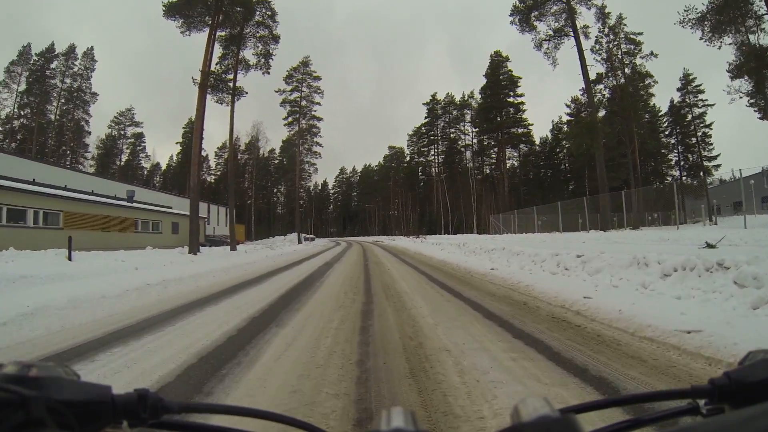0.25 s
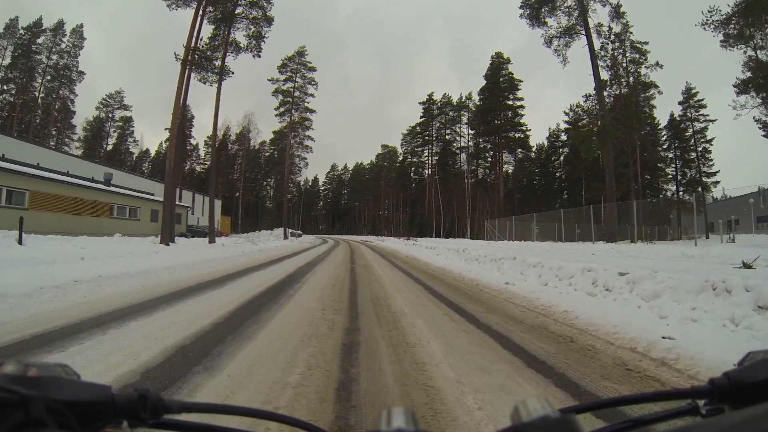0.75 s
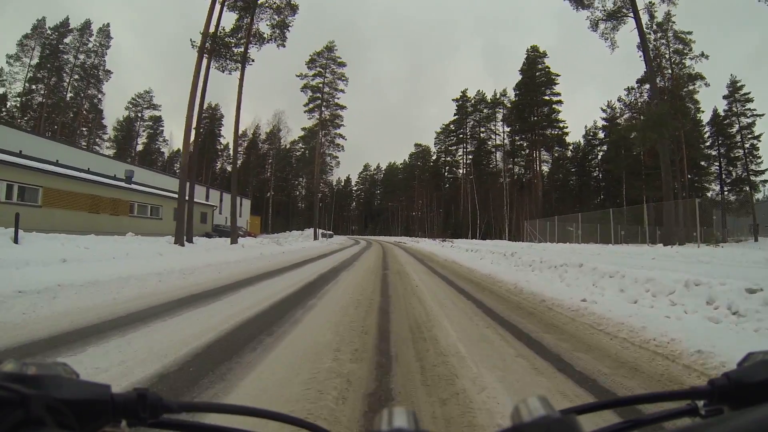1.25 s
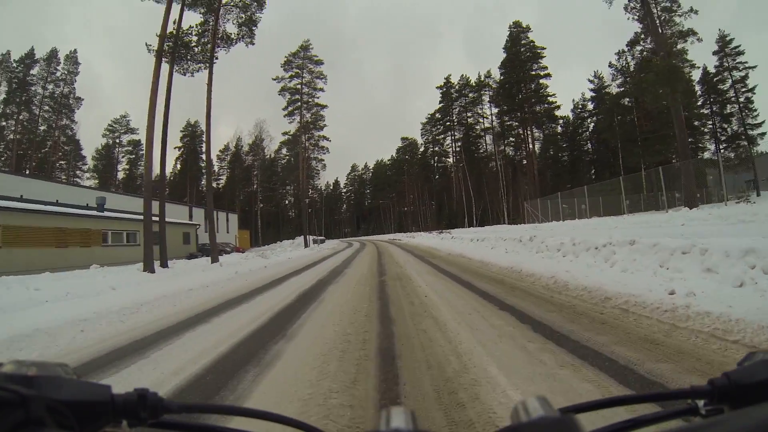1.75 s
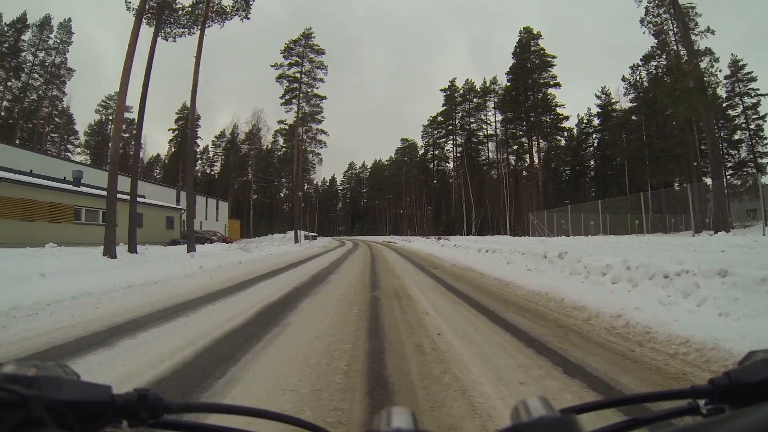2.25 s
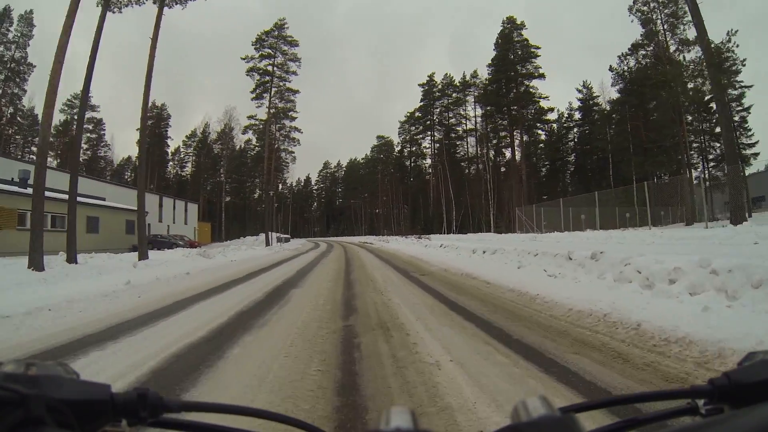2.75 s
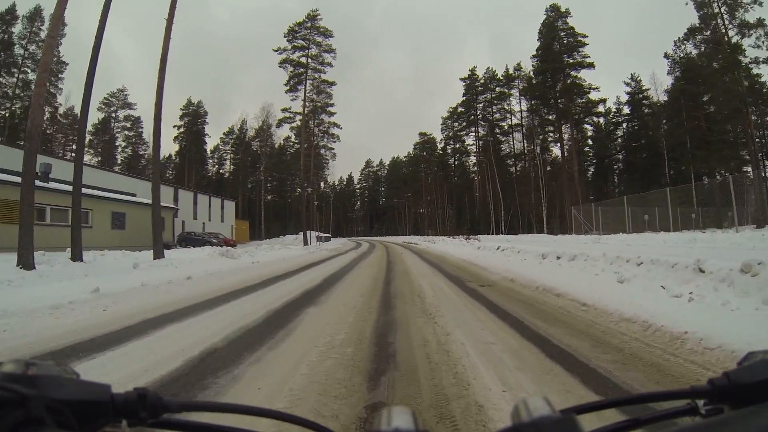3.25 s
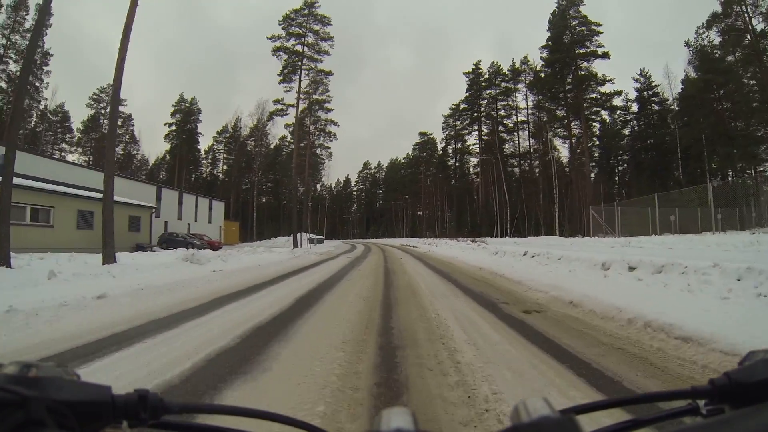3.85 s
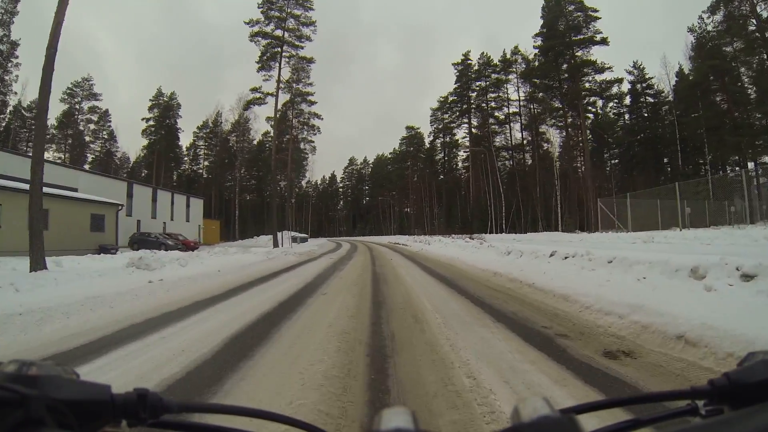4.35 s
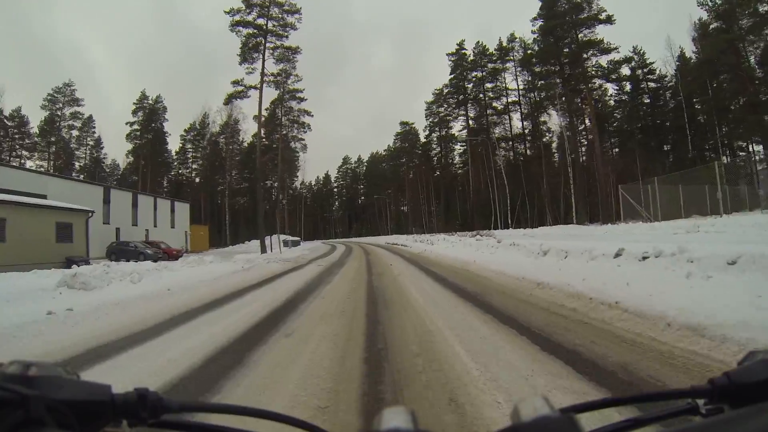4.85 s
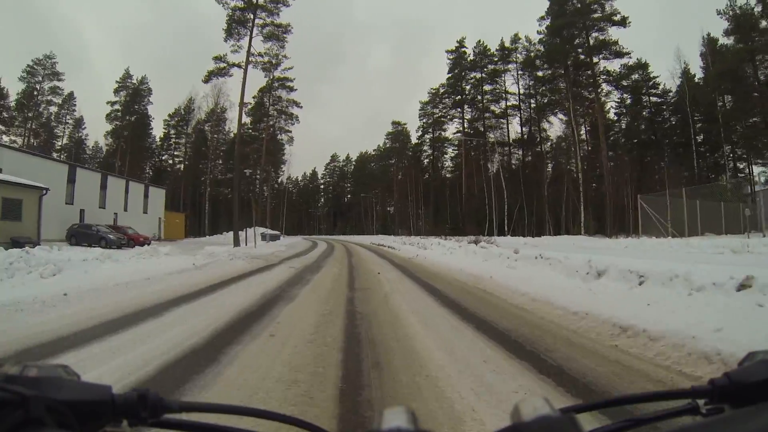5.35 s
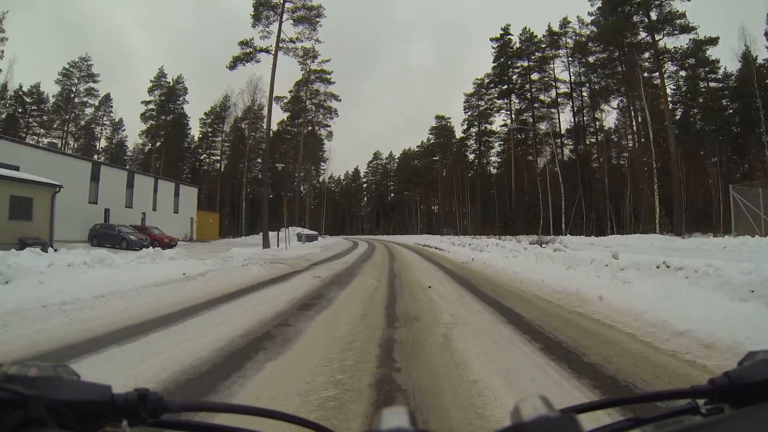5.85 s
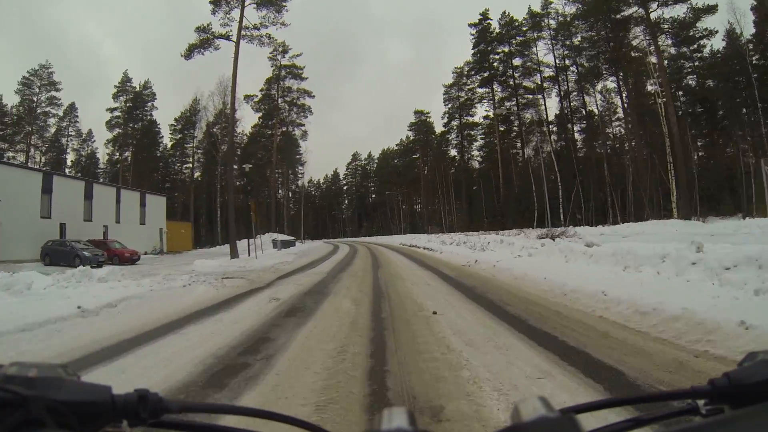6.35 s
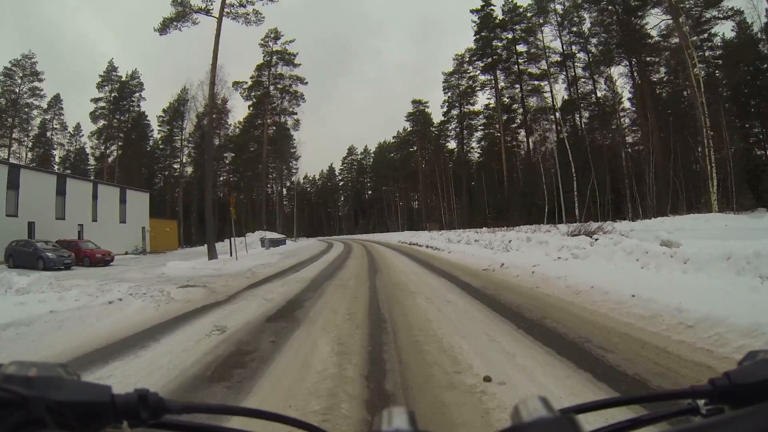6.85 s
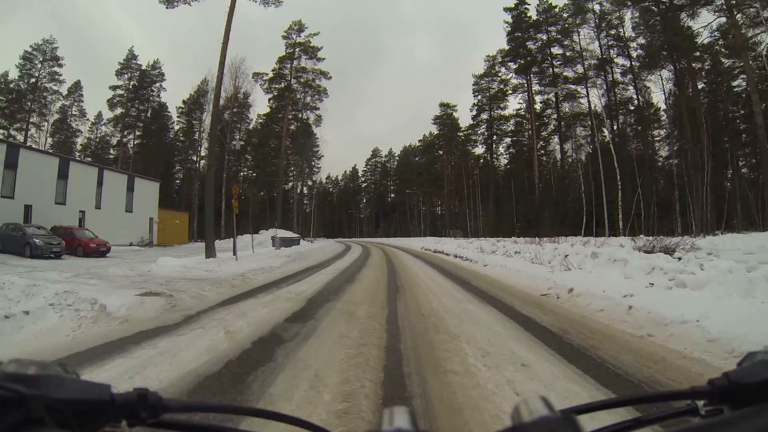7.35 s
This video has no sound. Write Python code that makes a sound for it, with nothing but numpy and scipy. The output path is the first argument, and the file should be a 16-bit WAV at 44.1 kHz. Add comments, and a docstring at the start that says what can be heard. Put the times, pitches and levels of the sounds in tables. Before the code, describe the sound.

A bike rides a snowy forest road outdoors. The handlebar microphone, dulled by its case, catches vibrating frame hum, rough tyre buzz, crumbling snow and gusty low wind. Irregular jolts and faint grit ticks come and go, one loud crack briefly ducks everything at about 5.2 seconds, and a rougher rattling patch follows before the ride continues.

```python
"""Bicycle over packed snow, heard from the handlebar

The microphone rides in a closed case clamped to the handlebar of a bicycle on packed snow. Road shake comes
through the frame: two wavering tones are the clamp and handlebar bending; noise through resonances is the case
ringing with tyre buzz, crunch and knocks. Fine spray and grit ticks leak through the wall, one hard crack
strikes the case, filtered noise makes the wind, and a peak limiter ducks everything after the loudest peaks."""
import sys
import numpy as np
from scipy import signal
from scipy.fft import rfft, irfft
from scipy.io import wavfile
from scipy.ndimage import uniform_filter1d

SR = 44100
rng = np.random.default_rng(int(sys.argv[2]) if len(sys.argv) > 2 else 0)


def invert_db(x):
    """Field ratio 10**(x/20) for x, a level in decibels (scalar or array-like)."""
    u = np.asarray(x, float) / 20
    return 10 ** u


def store_wav(level_fs):
    """Save 16-bit WAV to argv[1]."""
    pcm = np.round(np.clip(np.atleast_2d(level_fs), -1, 1) * 32767)
    wavfile.write(sys.argv[1], SR, pcm.T.astype(np.int16))


N = 335160


def case(buzz_db):
    """The case as a resonator: buzz drives its low modes, crunch the upper ones, knocks drive all."""
    # modes of the case and its clamp: f/Hz, width/Hz, relative level/dB
    low_modes = [(302, 89, -15.5), (362.4, 63, -13), (471.2, 77.5, 0.5), (583.4, 86.6, 2),
                 (666.6, 39.4, -5), (739.5, 48, -5), (886, 159, -14.5)]
    mid_modes = [(1154, 850, -6.5), (1417, 74, -3), (1565, 218, 2), (1788, 340, -6.5), (1992, 190, -1)]
    high_modes = [(2380, 150, -10.5), (3012, 546, 5.5), (3564, 70, -2), (3907, 307, -2.5), (4456, 510, -31)]
    # what leaks through the wall: f/Hz, relative level/dB
    leak = [(3000, -68), (3900, -33), (4700, 0), (5100, 1.5), (6400, -7), (7060, -14.5), (7700, -4.5),
            (8500, -8), (10000, -14), (11300, -15), (12300, -20), (12800, -23), (13500, -24),
            (15200, -23.5)]
    # the snow under the tyre between the swells: t/s, crunch level/dB, fine spray level/dB (both relative)
    snow_levels = [(0, -35.5, -62), (1, -36.5, -64), (2.5, -30, -62.5), (3.3, -31, -62), (4.7, -32, -62.5),
                   (5.3, -34, -64.5), (5.7, -35, -62.5), (6, -41, -68.5), (7, -37.5, -69.5),
                   (7.6, -28, -61)]
    crunch_db, spray_db = curves(snow_levels) + swells()
    runs = np.minimum(clumps(per_s=90, seconds=0.02) + 0.08 * clumps(per_s=5, seconds=0.01), 3.5)
    buzz = invert_db(buzz_db) * tyre_buzz(runs)
    crunch, spray = snow_grains(runs)
    crunch = invert_db(crunch_db) * crunch
    spray = invert_db(spray_db) * spray
    thud, knock, clack, tick = knocks()

    low = ring(buzz + thud, low_modes)
    mid = ring(invert_db(-0.93) * crunch + knock, mid_modes)
    # the more spray there is against crunch, the brighter the crunch
    high_db = -9.5 + 0.22 * (spray_db - crunch_db + 29.5)
    high = ring(invert_db(high_db) * crunch + clack, high_modes)
    top = invert_db(11.5) * coloured(spray + tick, leak)
    wall = signal.butter(3, 4700, fs=SR, output="sos")  # the closed wall dulls the frame's sound
    return signal.sosfilt(wall, low + mid + high) + top


def tyre_buzz(runs):
    """Tyre shake: noise whose level follows the runs of breaking crust and a fast flutter; rms 1."""
    shake_db = 1.2 * runs + 1.1 * flutter(0.0079)
    buzz = evened(rng.standard_normal(N) * invert_db(shake_db))
    return evened(patchy(buzz, patchy_db=1.2))


def snow_grains(runs):
    """Crunch and fine spray: random grain clicks over noise, swelling with the runs; each of rms 1."""
    grit = grains(per_s=1400, spread_db=3.6) + .3 * rng.standard_normal(N)
    fine = grains(per_s=2500, spread_db=3.8) + 0.45 * rng.standard_normal(N)
    crunch = grit * invert_db(2.35 * runs)
    spray = (fine + .4 * grit) * invert_db(1.8 * np.minimum(runs, 2))
    return evened(patchy(crunch, patchy_db=2.0)), evened(patchy(spray, patchy_db=1.9))


def swells():
    """Extra dB of crunch and of spray: smooth bumps, about once a pedal stroke and on crusty patches."""
    # peak t/s, half length/s, extra crunch level/dB, extra spray level/dB
    bumps = [(0.257, 0.11, 7, 2.5), (0.533, 0.24, 7, 3.5), (1.261, 0.13, 7, 6.5), (1.592, 0.11, 3, 4.5),
             (2.14, .14, 6.5, 1.5), (2.833, 0.094, 4.5, 9), (3.775, 0.23, 6.5, 6), (4.34, 0.078, 5, 8.5),
             (5.16, 0.19, 6.5, 5), (6.17, 0.081, 12.5, 5.5), (6.554, 0.27, 4, 3), (7.334, 0.079, 7, 11)]
    t = np.arange(N) / SR
    return sum(np.outer(db, np.exp(-((t - s) / half) ** 2)) for s, half, *db in bumps)


def knocks():
    """Four drives, from thud to tick, holding one burst per knock; the higher, the shorter and sharper."""
    # single knocks and low thumps through the frame, strong and weak, before the trim:
    # t/s, level/dB, thud level/dB and clack level/dB (both re the knock), length/s
    placed_knocks = [(0.1174, -17, -25, -10, 0.0039), (0.1824, -29, 11, 0, 0.0044),
                     (0.2813, -8, 0, -17.5, 0.0041), (0.377, -14.5, -5, -24, 0.0054),
                     (0.4135, -13, -2.5, -23, 0.0047), (0.4439, -16, 3, -31, 0.0063),
                     (0.4833, -16.5, 5, -11, 0.0042), (0.5227, -14.5, -4, -11.5, 0.0047),
                     (1.2072, -19.5, -9, -11, 0.0045), (1.2684, -23, 9, -4, 0.0031),
                     (1.2994, -20.5, 9, -0.5, 0.0042), (1.3818, -26.5, -10, -0.5, 0.0054),
                     (1.5964, -17, 11, -8, 0.0036), (1.7828, -20.5, 3, -9, 0.0042),
                     (1.9135, -7, -15, -22, 0.0026), (1.9544, -17, -11, -11, 0.0059),
                     (2.0263, -6.5, 6, -15, 0.0034), (2.0552, -9, -13, -26, 0.0034),
                     (2.0747, -16.5, 6, -40, 0.0049), (2.1181, -14.5, 10, -12, 0.0035),
                     (2.2039, -11.5, -7, -12, 0.0046), (2.4044, -12.5, -4, -14, 0.0038),
                     (2.5481, -25, 1, -18, 0.0052), (2.6604, -18.5, 8, -7, 0.0056),
                     (2.8779, -20.5, -15, -21, 0.0042), (3.0774, -19.5, 13, -14, 0.0037),
                     (3.5119, -15.5, -8, -22, 0.0039), (3.7025, -20.5, 1, -4, 0.0042),
                     (3.8397, -2.5, -0.5, -18, 0.0045), (4.0607, -11, -8, -18, 0.0032),
                     (4.118, -33, 16, -4, 0.0042), (4.2078, -12, -14, -16, 0.0067),
                     (4.2802, -18, 3, -22, 0.0081), (4.3894, -5.5, 3, -7.5, 0.0038),
                     (4.6039, -19.5, 3, -14, 0.0046), (4.9806, -8, -10, -19, 0.0044),
                     (5.1424, -25.5, 10, -18, 0.0052), (5.449, -7, -4, -17, 0.0057),
                     (5.5353, -15.5, -8, -13, 0.0046), (5.7229, -16, 0, -11, 0.0042),
                     (6.0726, -18, 14.5, -22, 0.0031), (6.1215, -12.5, 0, -11, 0.0079),
                     (6.1809, -11.5, 1, -14, 0.0042), (6.2093, -15, 7, -15, 0.0035),
                     (6.2282, -14, 7, -9.5, 0.0046), (6.2632, -22.5, 12.5, -15, 0.0042),
                     (6.2746, -12.5, -10, -16, 0.0036), (6.327, -17, -2, -18, 0.005),
                     (6.3594, -9, -10, -11.5, 0.0038), (6.3934, -18, 15, -5, 0.0028),
                     (6.4054, -26.5, 19.5, -14, 0.0038), (6.4338, -12, 4, -12, 0.006),
                     (6.4684, -27.5, 17.5, -9, 0.0052), (6.5655, -12, -11, -17.5, 0.0042),
                     (6.5949, -9, -14, -14, 0.0042), (6.6194, -9.5, 1, -10, 0.0052),
                     (6.6403, -7.5, -3.5, -8, 0.0047), (6.6682, -10, -3, -13.5, 0.0073),
                     (6.7374, -25, 21.5, -21, 0.0047), (6.7575, -10, -9, -12.5, 0.0032),
                     (6.8339, -13, -2, -10, 0.0057), (6.8463, -9.5, -7, -18, 0.0064),
                     (6.8917, -2, -3, -14.5, 0.0029), (6.8992, -1.5, 5.5, -23, 0.0021),
                     (6.9301, -15.5, -14, -14, 0.005), (7.1038, -5.5, 9, -8.5, 0.0028),
                     (7.3467, -18, 11.5, -8.5, 0.008), (7.4395, -8.5, 0, -25, 0.0054)]
    # grit flicked against the case, before the trim: t/s, level/dB
    grit_ticks = [(0.1181, -37.5), (0.1824, -43), (1.2396, -39.5), (1.2915, -43.5), (1.3823, -40),
                  (2.0298, -39), (2.2034, -45.5), (2.6609, -35.5), (3.8402, -38), (4.3924, -36),
                  (4.9901, -28), (5.7239, -34), (5.9823, -50), (6.1818, -44.5), (6.1994, -50),
                  (6.2794, -46), (6.6179, -35), (6.6672, -38), (6.9002, -39.5), (7.1067, -43)]
    tick_db = -48.5  # treble of a knock re its level
    grit_s = 0.0031
    rows = list(placed_knocks) + small_knocks()
    drive = np.zeros((4, N + 2048))
    noise = rng.standard_normal((len(rows), 4, 2048))
    for (s, db, thud_db, clack_db, seconds), shake in zip(rows, noise):
        at = round(s * SR)
        # per drive: level with a fixed trim, share of the length, rise time in s
        parts = ((thud_db - 4.0, 1.4, .0015), (-8.5, 1.1, .0005),
                 (clack_db - 3.5, .9, .0003), (tick_db, .6, .0001))
        for row, (re_db, lasting, rise) in enumerate(parts):
            drive[row, at:at + 2048] += invert_db(db + re_db) * burst(seconds * lasting, shake[row], rise)
    grit_noise = rng.standard_normal((len(grit_ticks), 2048))
    for (s, db), shake in zip(grit_ticks, grit_noise):
        at = round(s * SR)
        drive[3, at:at + 2048] += invert_db(db - 9) * burst(grit_s, shake, rise=.0001)
    return drive[:, :N]


def small_knocks():
    """The many small jolts: rows like the placed ones, at random times and with random colour."""
    per_s, level_db, spread_db = 8, -24.5, 1
    length_s, length_spread = .0038, 0.58  # spread of the log length
    draw = rng.standard_normal((200, 4))
    s = np.cumsum(rng.exponential(1, 200)) / per_s
    db = [level_db, 3, -9] + draw[:, :3] * [spread_db, 6, 6]  # knock, thud, clack
    seconds = length_s * np.exp(length_spread * draw[:, 3])
    return list(np.column_stack([s, db, seconds])[s < N / SR])


def burst(seconds, noise, rise):
    """A shaken contact: noise that starts fast, dies within the given time and leaves a weak rattle."""
    t = np.arange(len(noise)) / SR
    body = np.exp(-(t / max(seconds, .0004)) ** 2)
    rattle = invert_db(-12.5) * np.exp(-t / (3.7 * seconds))
    return noise * (body + rattle) * (1 - np.exp(-t / rise))


def snap():
    """One hard crack on the case itself: its modes, a bright edge and a faint metal ring after it."""
    # t/s, level/dB, length/s
    s, db, seconds = (5.2484, 7, .0034)
    # modes struck by the crack: f/Hz, width/Hz, relative level/dB
    modes = [(600, 400, 6.5), (1040, 840, 0), (1440, 440, 1), (2310, 450, -3.5), (2964, 700, -2),
             (4150, 350, 0), (5470, 390, -19.5)]
    # spectrum of the bright edge: f/Hz, relative level/dB
    edge_colour = [(4000, -41), (5500, -1), (8000, -9.5), (13000, -3.5), (16000, -19.5)]
    # metal left ringing: f/Hz, level/dB, time to fall 60 dB/s
    metal = [(3130, -33, .12), (3530, -39, .12), (4540, -31, .12), (4860, -40, .1), (5180, -35, .15)]
    out, at, t = np.zeros(N), round(s * SR), np.arange(8192) / SR
    body, edge = rng.standard_normal((2, 8192))
    crack = ring(body * np.exp(-(t / seconds) ** 4), modes)[:8192]
    edge = evened(coloured(edge, edge_colour)) * np.exp(-(t / (.55 * seconds)) ** 2)
    tail = sum(invert_db(d - 60 * t / t60) * np.sin(2 * np.pi * hz * t) for hz, d, t60 in metal)
    out[at:at + 8192] = invert_db(db) * (crack + invert_db(-25) * edge) + tail
    return out


def hum(hz, db, waver_hz, wobble_db, seconds):
    """A lightly damped bending mode kept going by the road: one tone wavering in pitch and level."""
    turns = np.cumsum(hz + waver_hz * flutter(seconds)) / SR
    level = np.sqrt(2) * invert_db(db + wobble_db * flutter(seconds))
    return level * np.sin(2 * np.pi * turns)


def wind(level_db):
    """Wind on the case: lumpy low noise in gusts; the roar above the rumble has its own level."""
    # colour of the wind: f/Hz, relative level/dB
    colour = [(8.8, -32.5), (15, 2.5), (64, 1), (85, -8), (119, -11.5), (173, -12), (231, -14.5),
              (300, -14.5), (390, -53.5), (660, -120)]
    # upper roar: t/s, level/dB
    roar_levels = [(0.08, -50.5), (0.6, -43.5), (3.99, -37), (4.29, -31), (5.16, -36), (6.11, -34),
                   (6.65, -33), (7.5, -36.5)]
    roar_from_hz = 90.6
    air = coloured(rng.standard_normal(N), colour)
    rumble = signal.sosfiltfilt(signal.butter(4, roar_from_hz, fs=SR, output="sos"), air)
    roar = air - rumble
    gusts = invert_db(1.7 * flutter(0.069))
    return gusts * (invert_db(level_db) * evened(rumble) + invert_db(curves(roar_levels)[0]) * evened(roar))


def clumps(per_s, seconds):
    """Crust gives way suddenly and crumbles on: random steps up that die away; mean 0, rms 1."""
    kicks = rng.exponential(1, N) * (rng.random(N) < per_s / SR)
    shape = signal.lfilter([1], [1, -np.exp(-1 / (seconds * SR))], kicks)
    return evened(shape - shape.mean())


def grains(per_s, spread_db):
    """Random clicks, most small, a few large; rms 1."""
    size = invert_db(spread_db * np.minimum(rng.exponential(1, N), 4)) * rng.choice([-1., 1.], N)
    return evened(size * (rng.random(N) < per_s / SR))


def patchy(x, patchy_db):
    """The colour drifts as the snow changes: random patches of about 700 Hz by 50 ms."""
    z = signal.stft(x, nperseg=256)[2]
    field = uniform_filter1d(rng.standard_normal(z.shape), size=4, axis=0)
    field = evened(uniform_filter1d(field, size=17, axis=1))
    return signal.istft(z * invert_db(patchy_db * field), nperseg=256)[1][:N]


def ring(x, modes):
    """Convolves with the modes; each is a resonance applied twice, neighbours in opposite sign."""
    hz = np.fft.rfftfreq(8192, 1 / SR)
    response = sum((-1) ** k * invert_db(db) / (1 + 2j * (hz - f) / width) ** 2
                   for k, (f, width, db) in enumerate(modes))
    taps = irfft(response)[:4096]
    return signal.oaconvolve(x, taps / np.linalg.norm(taps))[:N]


def coloured(x, points):
    """Filters by a spectrum drawn on a log frequency axis."""
    hz = np.fft.rfftfreq(len(x), 1 / SR)
    f, db = np.transpose(points)
    gain = invert_db(np.interp(np.log(hz + 1), np.log(f + 1), db))
    return irfft(rfft(x) * gain, len(x))


def flutter(seconds):
    """Smooth chance of rms 1 that changes over the given time."""
    width = max(int(seconds * SR), 1)
    return evened(uniform_filter1d(uniform_filter1d(rng.standard_normal(N), width), width))


def curves(rows):
    """Every column of a table after its times, sample by sample."""
    s, *columns = np.transpose(rows)
    return [np.interp(np.arange(N) / SR, s, c) for c in columns]


def evened(x):
    """Scales to rms 1."""
    return x / np.sqrt(np.mean(x ** 2) + 1e-20)


def scene():
    """Case, crack, clamp, handlebar and wind all reach one microphone."""
    # slow levels along the ride:
    # t/s, clamp sway level/dB, handlebar flex level/dB, wind rumble level/dB, tyre buzz level/dB
    ride = [(0, -20.5, -43.5, -36, -26), (.4, -26.5, -46, -30, -20.5), (1, -34.5, -42.5, -29, -23.5),
            (1.6, -24.5, -42.5, -27.5, -21), (2.1, -27, -33.5, -25.5, -23.5),
            (2.45, -19.5, -40, -22.5, -20.5), (3.2, -19.5, -40.5, -26.5, -20.5),
            (3.8, -20, -36.5, -21.5, -18), (4.25, -25.5, -37.5, -23.5, -19.5), (4.8, -15.5, -29, -21, -19),
            (5.3, -18.5, -44, -20.5, -19), (5.5, -17, -26, -27, -19), (6.1, -22, -30.5, -18, -19.5),
            (6.8, -20, -29.5, -26, -20.5), (7.3, -23, -31, -29.5, -20.5), (7.6, -20, -33.5, -19.5, -13.5)]
    sway_db, flex_db, wind_db, buzz_db = curves(ride)
    flex_hz = 170.9 - .6 * np.arange(N) / SR  # the flex tone sinks slowly, in Hz per s
    sway = hum(59.6, sway_db, waver_hz=2.6, wobble_db=2.5, seconds=0.052)
    flex = hum(flex_hz, flex_db, waver_hz=3.8, wobble_db=4.5, seconds=.035)
    return (case(buzz_db) + snap() + sway + flex + wind(wind_db))[None]


def top_cut(x):
    """Nothing passes above the cut-off."""
    return signal.sosfilt(signal.butter(12, 15200, fs=SR, output="sos"), x)


def record(dry):
    """Peaks over the threshold pull the gain down in a few ms; it climbs back steadily; overshoot is squashed."""
    threshold_db, recovery_db_per_s, lag_s = -3.0, 30.0, .0009
    peak_db = 20 * np.log10(uniform_filter1d(abs(dry[0]), 24) + 1e-9)
    fall = np.arange(N) * recovery_db_per_s / SR
    held_db = np.maximum.accumulate(peak_db + fall) - fall  # each peak, sinking steadily after it
    over_db = np.maximum(held_db - threshold_db, 0)
    lag = np.exp(-1 / (lag_s * SR))
    ducked = dry / invert_db(signal.lfilter([1 - lag], [1, -lag], over_db))
    squashed = ducked / (1 + abs(ducked) ** 4) ** (1 / 4)
    return top_cut(squashed)


dry = scene()
out = record(dry)
store_wav(out)
```